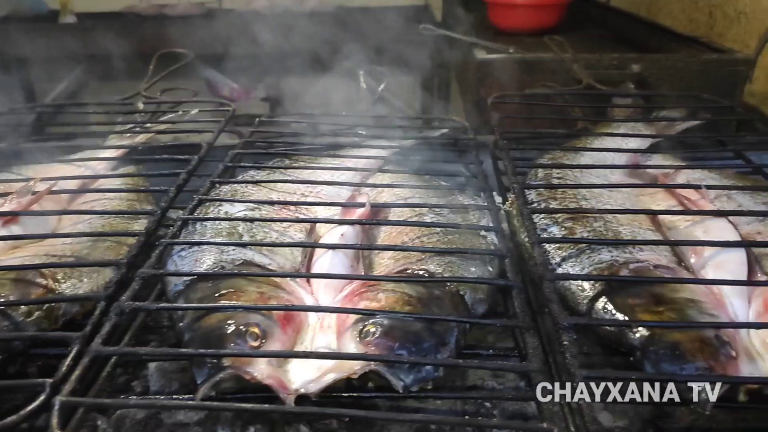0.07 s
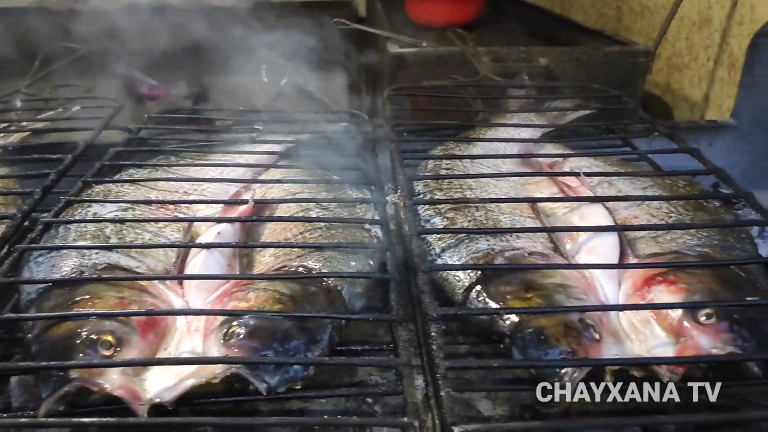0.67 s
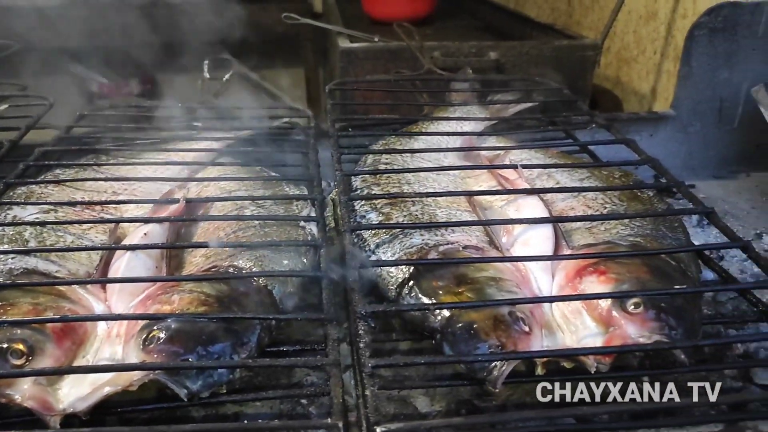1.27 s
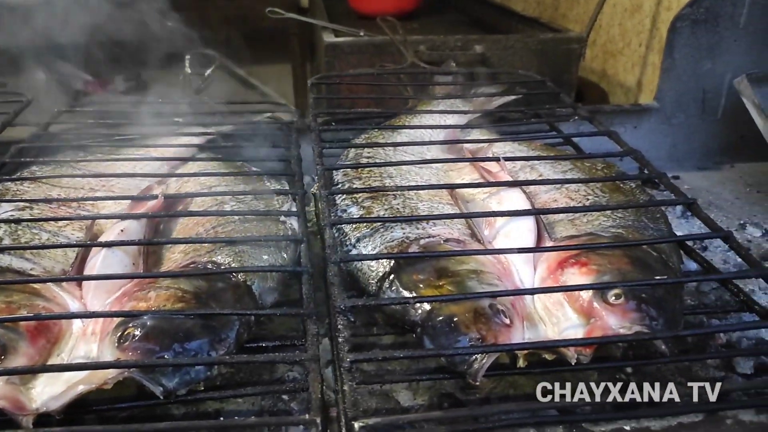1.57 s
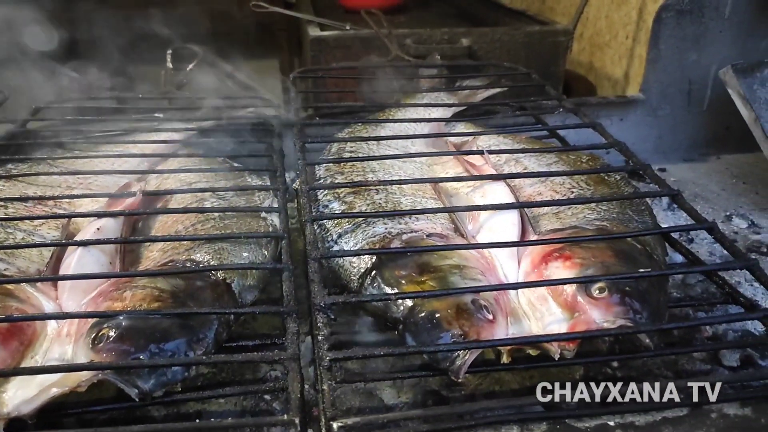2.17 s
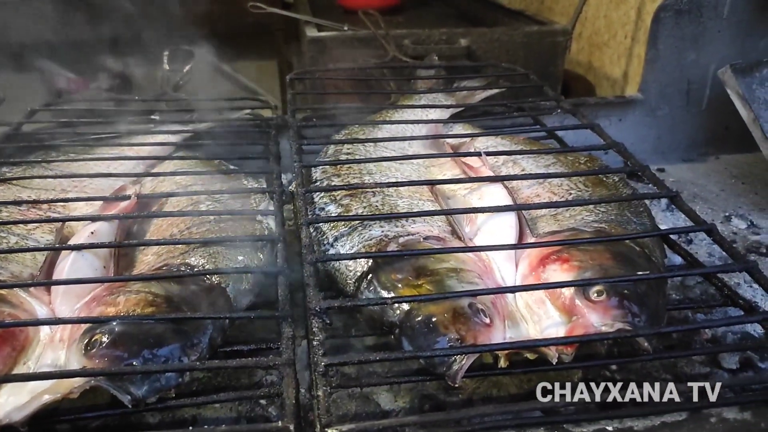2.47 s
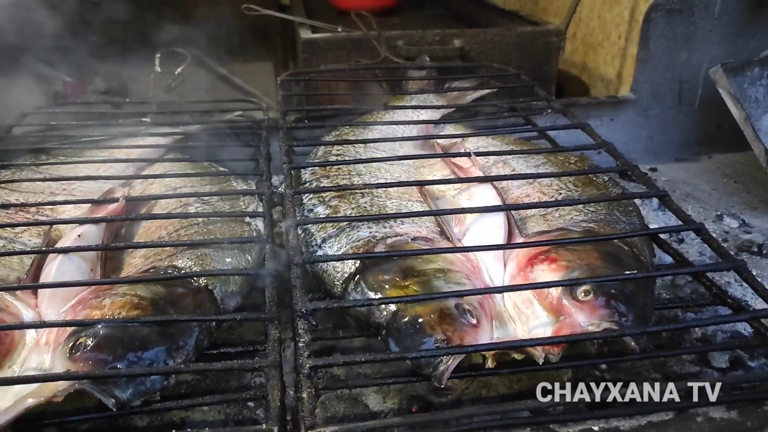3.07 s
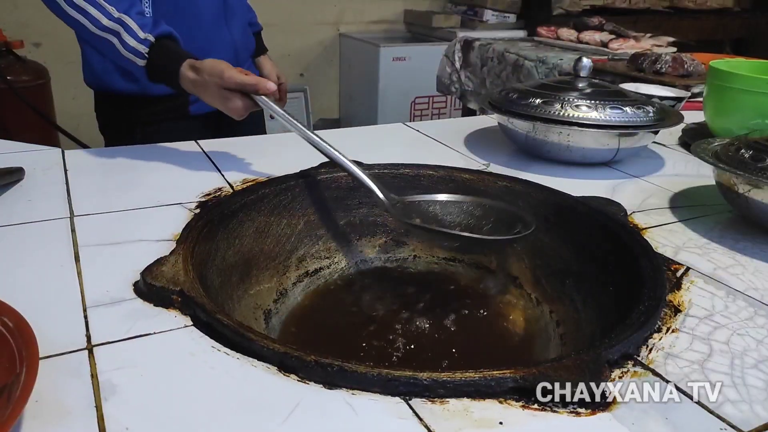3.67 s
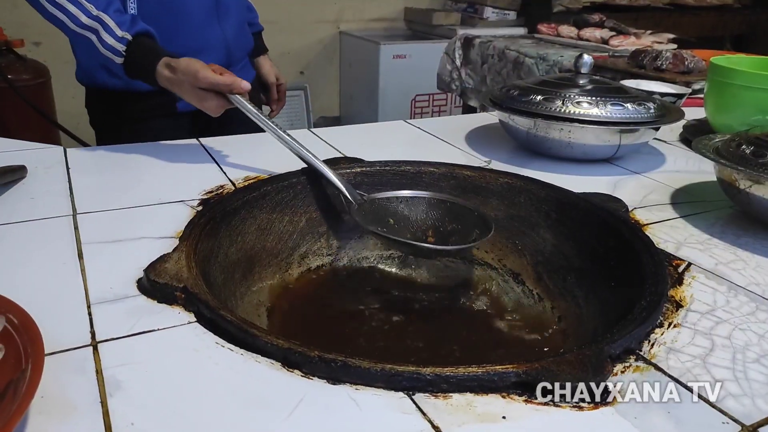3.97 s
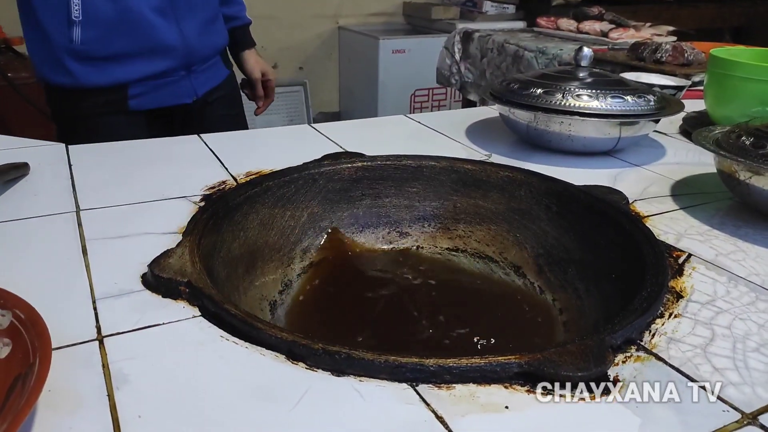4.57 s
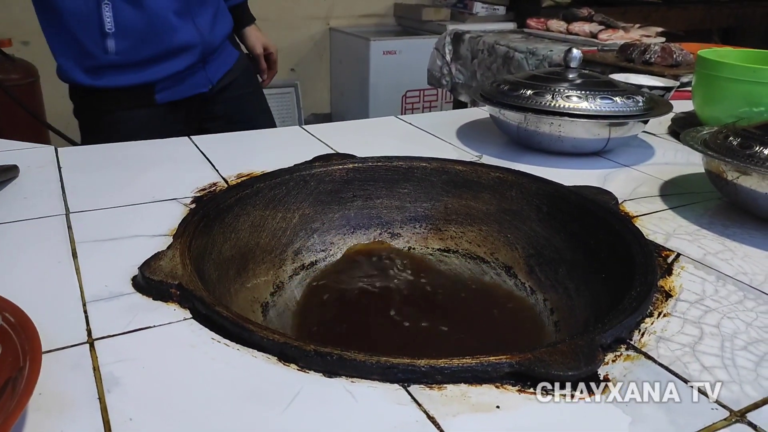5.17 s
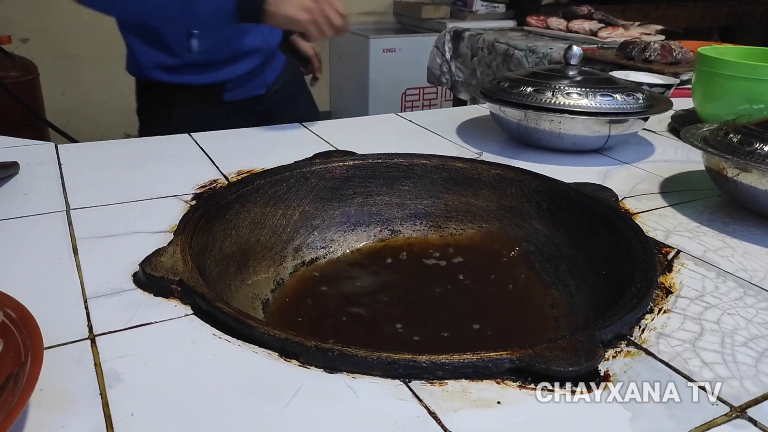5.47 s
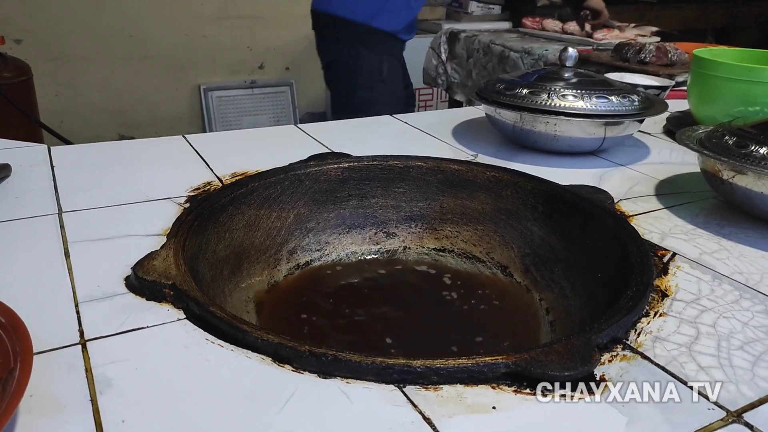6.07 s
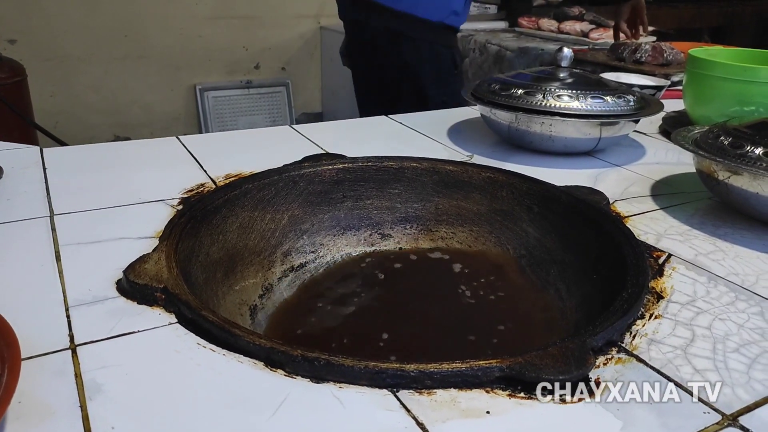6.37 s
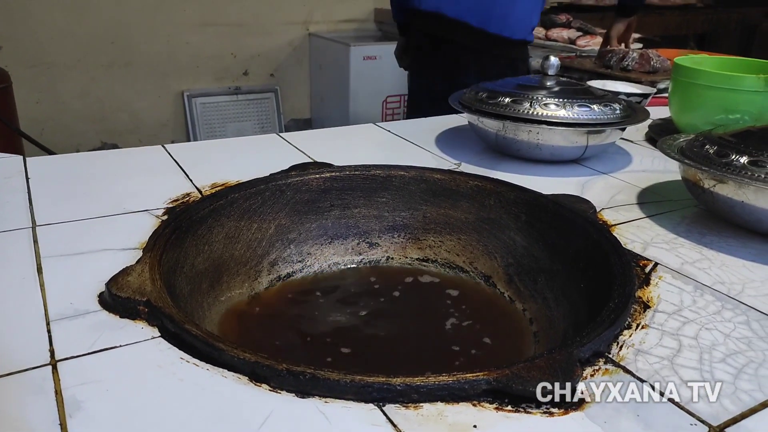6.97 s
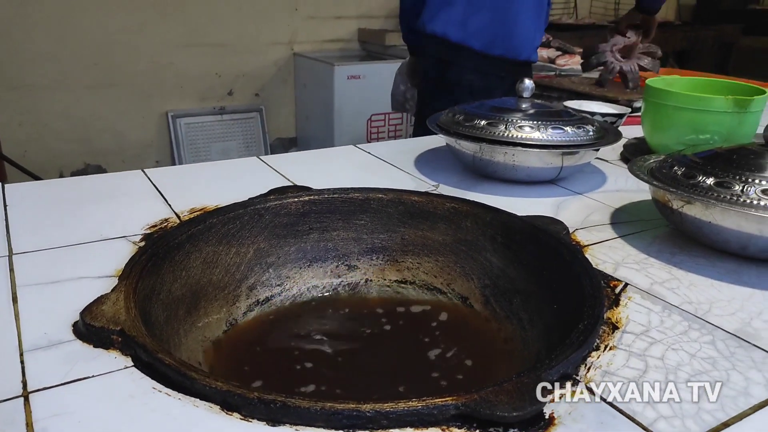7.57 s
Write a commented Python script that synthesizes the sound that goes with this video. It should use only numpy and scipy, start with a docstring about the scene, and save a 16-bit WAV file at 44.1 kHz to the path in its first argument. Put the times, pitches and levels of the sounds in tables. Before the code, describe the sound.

Fish sizzles on a charcoal grill in short hissing flares, with sharp snaps of fat over a low rush of air and a distant revving engine. The sound cuts to a tiled kitchen, where a gas burner rumbles under a cauldron. Water drops pop and crackle in the hot oil, then a steel skimmer clanks onto the counter. The burner carries on with a hiss and a faint whistle, heard close in stereo.

```python
"""Fish sizzles and spits on a charcoal grill as juice and fat hit the coals; an engine revs far off.
The grill fades out and a tiled kitchen fades in. There a gas burner rumbles under a cauldron,
water drops burst in the hot oil and a steel skimmer is laid on the counter.
Two microphones a hand's span apart hear both places."""
import sys
import numpy as np
from scipy import signal
from scipy.fft import rfft, irfft
from scipy.io import wavfile
from scipy.ndimage import uniform_filter1d

SR = 44100
rng = np.random.default_rng(int(sys.argv[2]) if len(sys.argv) > 2 else 0)


def put_to_file(sound):
    """Save the sound as 16-bit audio at rate SR, in the file named by the first command-line argument."""
    columns = np.atleast_2d(sound).T  # one column per channel
    safe = np.clip(columns, -1, 1)
    whole_steps = np.round(safe * 32767)
    wavfile.write(sys.argv[1], SR, whole_steps.astype(np.int16))


N = 344862
TIME = np.arange(N) / SR
HZ = np.maximum(np.arange(N // 2 + 1) * SR / N, 1)
MIC_SPAN_S = 0.00047   # travel time from one microphone to the other
KITCHEN_START_S = 3.412


def from_db(db):
    """Decibels to gain."""
    return 10 ** (np.asarray(db) / 20)


def unit_power(x):
    """Scale to unit power."""
    return x / np.sqrt(np.mean(x ** 2) + 1e-20)


def in_time(rows):
    """Each column of a curve, sample by sample."""
    time_s, *columns = np.transpose(rows)
    return [np.interp(TIME, time_s, column) for column in columns]


def swells(rows):
    """A smooth bump in dB for each row: middle_s, length_s (at half height), rise_db."""
    return sum(rise_db * .5 ** ((2 * (TIME - s) / length_s) ** 2) for s, length_s, rise_db in rows)


def colour(points, peaks=()):
    """Gain per frequency: an outline (freq_hz, gain_db) rolled off past its ends, plus resonances."""
    hz, db = np.transpose(points)
    gain_db = np.interp(np.log(HZ), np.log(hz), db)
    for centre_hz, width_hz, lift_db in peaks:
        gain_db = gain_db + lift_db / (1 + (2 * (HZ - centre_hz) / width_hz) ** 2)
    return from_db(gain_db) / np.sqrt((1 + (hz[0] / HZ / 1.3) ** 8) * (1 + (HZ / hz[-1] / 1.3) ** 8))


def drift(rate_hz):
    """A random wander with spread 1."""
    return unit_power(irfft(rfft(rng.standard_normal(N)) / (1 + (HZ / rate_hz) ** 2), N))


def diffuse(gain):
    """Noise from all sides: alike at both microphones in the bass, unrelated in the treble."""
    alike = np.clip(1.007 * np.sinc(2 * HZ * MIC_SPAN_S) / (1 + (HZ / 1500) ** 2), -1, 1)
    mid, side = rfft(rng.standard_normal((2, N)))
    pair = np.sqrt(1 + alike) * mid + np.sqrt(1 - alike) * side * [[1], [-1]]
    return unit_power(irfft(gain * pair, N))


def direct(x, lag_ms, gain=1):
    """Sound from the left reaches the right microphone later."""
    lag_s = np.array([[0], [lag_ms / 1000]])
    return irfft(rfft(x) * gain * np.exp(-2j * np.pi * HZ * lag_s), N)


def panned(pan_db):
    """Left and right gains; positive is to the left."""
    return from_db(np.array([[.5], [-.5]]) * pan_db)


def add(out, start_s, sound):
    """Mix a short sound in."""
    start = int(start_s * SR)
    out[:, start:start + sound.shape[-1]] += sound[..., :N - start]


def echoes(x, t60_s, gain=1):
    """Dense reflections that die away, different at each microphone."""
    t = TIME[:SR]
    tail = diffuse(gain)[:, :SR] * from_db(-60 * t / t60_s) * np.clip(t / 0.00074, 0, 1)
    return signal.fftconvolve(x, tail / np.sqrt(np.sum(tail ** 2) / 2), axes=1)[:, :N]


def steadied(x, window_s):
    """Even out the chance swings of a noise's level."""
    return x / np.sqrt(uniform_filter1d(np.mean(x ** 2, axis=0), int(window_s * SR)) + 1e-12)


def crackle(per_s, spread_db):
    """Tiny bursts of uneven size at random moments; unit power."""
    sizes = from_db(spread_db * np.minimum(rng.exponential(1, N), 4)) * rng.choice([-1, 1], N)
    return unit_power(sizes * (rng.random(N) < per_s / SR))


def snaps(rows, t60_s, grit_db):
    """A sharp click with a short gritty tail for each row: start_s, level_db, pan_db."""
    out, t = np.zeros((2, N)), TIME[:SR // 10]
    for start_s, level_db, pan_db in rows:
        snap = (t == 0) + rng.standard_normal(len(t)) * from_db(grit_db - 60 * t / t60_s)
        add(out, start_s, from_db(level_db) * panned(pan_db) * snap)
    return out


def draught():
    """Air moves steadily all round the grill, and some comes straight from the left."""
    # spectrum of the air: freq_hz, gain_db
    spectrum = [(15, -18), (25, -9), (54, -6.5), (100, -4), (192, -7.5), (223, -7), (248, -9.5),
                (281, -8.5), (387, -4.5), (468, -18.5), (567, -15.5), (796, -20.5), (1300, -22),
                (2210, -26), (4000, -30), (5200, -66), (8800, -120)]
    # its resonances: centre_hz, width_hz, lift_db
    resonances = [(130, 18, 2.4), (294, 20, 2), (384.5, 18, 3.9), (573, 19, 9), (1120, 67, 4.7),
                  (1310, 80, 3.1)]
    # strength of the draught: time_s, level_db
    strength = [(0, -38.5), (.5, -37.5), (1.1, -37.5), (1.7, -39), (2.4, -39.5), (3.2, -39)]
    air = colour(spectrum, resonances)
    from_left = unit_power(direct(rng.standard_normal(N), lag_ms=0.48, gain=air))
    level = from_db(in_time(strength)[0] + .5 * drift(15))
    return level * (from_db(-0.7) * diffuse(air) + from_db(-6) * from_left)


def sizzle_level(treble):
    """Each drip flares, sags while it boils away, then dies back into a simmer that slowly dries up."""
    # juice dripping on the coals: start_s, level_db, attack_s, hold_s, treble_db
    drips = [(0.187, -46, 0.03, .012, 5.5), (0.45, -50, .035, .015, 3), (0.817, -46, .012, .012, -1),
             (0.976, -44.5, 0.11, 0.069, -3), (1.149, -43, 0.03, .008, 1.5), (2.213, -50, 0.037, .03, 0),
             (2.269, -38, 0.006, 0.12, -0.5)]
    simmer_db, drying_db_per_s, sag_db_per_s, release_db_per_s = -53, 0.8, 32.5, 145
    power = from_db(simmer_db - drying_db_per_s * TIME) ** 2
    for start_s, level_db, attack_s, hold_s, treble_db in drips:
        age = np.maximum(TIME - start_s, 0)
        fall_db = sag_db_per_s * age + release_db_per_s * np.maximum(age - attack_s - hold_s, 0)
        power += (np.minimum(age / attack_s, 1) * from_db(level_db + treble * treble_db - fall_db)) ** 2
    return np.sqrt(power)


def sizzle():
    """Juice boils off the coals in a grainy hiss; some drips are brighter than others."""
    # spectrum of the boiling juice: freq_hz, gain_db
    spectrum = [(900, -6.5), (2000, -5), (3300, -3.5), (5000, -6.5), (7400, -1.5), (9800, -9.5),
                (12000, -6), (15500, -9)]
    tone = colour(spectrum)
    grains = unit_power(direct(crackle(per_s=7000, spread_db=7), lag_ms=0.555, gain=tone))
    boil = from_db(1.25 * drift(40)) * (from_db(-6.5) * grains * panned(2.8) + from_db(3) * diffuse(tone))
    top = irfft(rfft(boil) / (1 + (9500 / HZ) ** 8), N)
    return sizzle_level(treble=False) * (boil - top) + sizzle_level(treble=True) * top


def spits():
    """Fat snaps on the coals over a faint tick of embers, with a short and a longer echo."""
    # spitting fat: start_s, level_db, pan_db
    fat = [(0.115, -15.5, -4), (0.8178, 1, 2), (1.723, -15, -3), (2.2114, -15, -0.5), (2.2741, -20, 17),
           (2.5461, -18, .5), (2.878, -19, -3), (2.9112, -16.5, 2)]
    embers = from_db(-71) * crackle(per_s=14, spread_db=6)
    sharp = colour([(1500, -9), (3100, -10), (4100, -5.5), (5600, -2.5), (7600, 0), (9800, -6.5),
                    (12000, -4.5), (15000, -6.5)])
    near = direct(snaps(fat, t60_s=0.0083, grit_db=-19.5) + embers, lag_ms=0.55, gain=sharp)
    return near + from_db(-6) * echoes(near, t60_s=0.065) + from_db(-3) * echoes(near, t60_s=0.39)


def engine():
    """Far off, a firing tone and its octave rise and fall with the throttle over the exhaust's rumble."""
    # the engine revving: time_s, firing_hz, level_db
    throttle = [(.4, 48.04, -62), (.58, 47.7, -57), (.7, 44.6, -37), (.85, 51.8, -33), (1.03, 61.2, -37),
                (1.2, 62.6, -50), (1.55, 60.6, -44), (1.8, 58.2, -34.5), (2.05, 58.6, -33),
                (2.4, 56.36, -37), (2.8, 46.5, -46), (3.3, 52.5, -46)]
    # the octave barks as it takes up the load: middle_s, length_s, rise_db
    bark = [(.57, 0.14, 14)]
    firing_hz, level_db = in_time(throttle)
    load_s = throttle[0][0]
    phase = 2 * np.pi * np.cumsum(firing_hz) / SR
    octave = from_db(-53.5 + swells(bark)) * np.minimum(TIME / load_s, 1) * np.sin(2 * phase)
    under_load = np.clip((TIME - load_s) / .3, 0, 1)
    exhaust = from_db(-46) * under_load * diffuse(colour([(25, -6), (50, 1.5), (85, -2.5)]))
    return np.sqrt(2) * (from_db(level_db) * np.sin(phase) + octave) + exhaust


def flame():
    """Strength of the gas flame in dB: a slow rise with surges on top."""
    # the flame flares up: middle_s, length_s, rise_db
    surges = [(3.72, 0.44, 3), (5.14, 0.15, 3.5), (6.4, 0.4, 6), (6.69, 0.12, 2), (7.08, 0.24, 3.5),
              (7.46, 0.32, 4)]
    rise_db_per_s = 0.17
    return rise_db_per_s * (TIME - KITCHEN_START_S) + swells(surges)


def burner():
    """The flame throbs and rumbles in the firebox, with a rush above it."""
    # spectrum of the flame: freq_hz, gain_db
    spectrum = [(15, -41), (25, -11), (57, 0), (176, -2.5), (245, -6), (281, -10), (317, -13.5), (352, -8),
                (482, -17.5), (554, -10.5), (1600, -30.5), (2080, -61), (3520, -120)]
    # firebox resonances: centre_hz, width_hz, lift_db
    firebox = [(90, 15, 3.4), (129.5, 11, 6), (167.8, 17, 7.4), (189.2, 12, 6.2), (274.6, 27, 7.3),
               (303, 10, 4.9), (353.2, 8.5, 7.8), (388.5, 16, 8.6), (444, 11, 6.5), (548.3, 10.4, 9.6),
               (579, 6.4, 6.6), (604, 9.1, 5.5), (667, 25, 6.2), (1003, 170, 8.1), (1229, 48, 12),
               (1403, 25, 12), (1466, 20, 6)]
    # the rumble alone swells and sags: middle_s, length_s, rise_db
    booms = [(3.76, .36, 1.5), (4.85, 0.26, -1), (5.1, 0.087, -0.5), (5.33, 0.043, 2), (5.45, 0.17, 4),
             (5.72, 0.16, 2), (6.055, 0.066, 6.5), (6.19, 0.074, -3.5), (6.63, .11, -1.5),
             (6.77, 0.09, 4.5), (6.92, 0.11, 5), (7.12, 0.18, 1.5), (7.41, .1, -1.5), (7.53, 0.22, 1)]
    # its deepest part drops away: middle_s, length_s, rise_db
    lull = [(6.42, 0.37, -6.5)]
    roar, low_share = colour(spectrum, firebox), 1 / (1 + (HZ / 400) ** 6)
    lower, upper = roar * np.sqrt(low_share), roar * np.sqrt(1 - low_share)
    rumble_db = -35 + 0.64 * flame() + swells(booms) + 1.4 * drift(9)
    rumble = from_db(rumble_db) * steadied(diffuse(lower), window_s=0.18)
    deep = irfft(rfft(rumble) / (1 + (HZ / 105) ** 8) / (1 + (40 / HZ) ** 4), N)
    rumble += (from_db(swells(lull)) - 1) * deep
    # part of the rush comes straight from the cauldron, the rest by way of the walls
    ahead = unit_power(direct(rng.standard_normal(N), lag_ms=0.1, gain=upper))
    rush_db = -45.5 + flame() + 0.7 * drift(10)
    return rumble + from_db(rush_db) * (from_db(-1.5) * diffuse(upper) + from_db(0.5) * ahead)


def gas_hiss():
    """Gas hisses from the jet, flickering, following the flame and slowly growing."""
    # spectrum of the gas: freq_hz, gain_db
    spectrum = [(700, -3.5), (1200, 3.5), (2200, 1.5), (3200, -2), (4100, -7.5), (4800, -8.5), (5850, -13),
                (7400, -8), (9200, -18.5), (12000, -17.5), (15500, -24)]
    # faint whistling of the jet: centre_hz, width_hz, lift_db
    resonances = [(2950, 96, 4.5), (3340, 280, 5)]
    jet, rise_db_per_s = colour(spectrum, resonances), 0.51
    near = unit_power(direct(crackle(per_s=11000, spread_db=1), lag_ms=0.286, gain=jet))
    level_db = -52.5 + 0.64 * flame() + 0.8 * drift(21) + rise_db_per_s * (TIME - KITCHEN_START_S)
    return from_db(level_db) * (from_db(4) * diffuse(jet) + from_db(-5.5) * near)


def whistle():
    """Off to the left the gas jet sings: a narrow band of noise that wavers in pitch and level."""
    # the whistle grows, climbs a little and spurts once: time_s, pitch_hz, level_db
    course = [(5.2, 3115, -62), (6.3, 3160, -59), (6.62, 3210, -53), (7.1, 3184, -52), (7.41, 3220, -51.5),
              (7.45, 3270, -42), (7.49, 3230, -48), (7.8, 3220, -52.5)]
    spread_hz, waver_hz, flutter_db = 150, 70, 1.6
    pitch_hz, level_db = in_time(course)
    phase = 2 * np.pi * np.cumsum(pitch_hz + waver_hz * drift(8)) / SR
    band = np.array([drift(spread_hz) * np.cos(phase) + drift(spread_hz) * np.sin(phase) for _ in "LR"])
    return from_db(level_db + flutter_db * drift(7.9)) * panned(7) * band


def fizz():
    """Water off the wet skimmer fizzes in the oil, then dies down to a simmer and stray ticks."""
    peak_s, fall_db_per_s = 3.33, 23
    level = from_db(-55 - fall_db_per_s * np.abs(TIME - peak_s)) + from_db(-73 + flame())
    stray = from_db(-68.5) * crackle(per_s=9.8, spread_db=1)
    tiny_drops = crackle(per_s=290, spread_db=18)
    larger_drops = from_db(-3.5) * crackle(per_s=20, spread_db=4)
    return level * (tiny_drops + larger_drops) + stray


def bubble(pitch_hz, width_hz):
    """A bursting bubble's note swells and dies within a few cycles; peak 1."""
    t = TIME[:SR // 40]
    note = t * np.exp(-np.pi * width_hz * t) * np.sin(2 * np.pi * pitch_hz * t)
    return note / np.abs(note).max()


def spatter():
    """Small droplets burst in the hot oil as sharp high ticks over the fizz."""
    # the loudest droplets: start_s, level_db, pitch_hz, width_hz, pan_db
    droplets = [(3.478, -29, 7000, 9000, 3), (3.5312, -37, 6400, 5000, -4), (3.556, -35, 12000, 6000, 2),
                (3.5602, -26.5, 7600, 3000, 0), (3.584, -19, 9630, 9000, -2), (3.6263, -35, 7750, 1500, 0),
                (3.6494, -28.5, 6500, 2980, 2), (3.667, -30, 8000, 5000, .5), (3.699, -21, 7560, 2200, -.5),
                (3.7, -29, 12500, 5000, 0), (3.77, -35, 7400, 5000, -.5), (3.787, -31, 6900, 5000, 0),
                (3.808, -19, 11000, 6000, 0), (3.838, -33, 8300, 2000, 0), (3.853, -22, 11500, 6000, -1),
                (3.866, -14, 7040, 6000, -3), (3.869, -12.5, 8200, 5000, 5), (3.871, -26, 12500, 5000, 0),
                (3.923, -33, 12000, 6000, 0), (4.008, -25.5, 7600, 6000, -2), (4.0555, -41, 7000, 4000, -5),
                (4.088, -36, 10900, 7000, 0), (4.1093, -27, 12000, 6000, -.5),
                (4.1283, -22.5, 8640, 8000, -1.5), (4.189, -21, 5700, 7800, -3),
                (4.5816, -31.5, 6740, 4030, 0), (4.6425, -36.5, 5260, 2000, -1),
                (5.0729, -32, 8500, 9000, 6), (5.265, -43, 4100, 700, 0), (5.35, -34, 6660, 3000, -3),
                (5.768, -36, 8900, 5000, -10), (6.145, -36, 9000, 7000, 0), (7.5925, -38, 7250, 4000, 12)]
    ticks = np.zeros((2, N)) + fizz()
    for start_s, level_db, pitch_hz, width_hz, pan_db in droplets:
        add(ticks, start_s, from_db(level_db + 4.5) * panned(pan_db) * bubble(pitch_hz, width_hz))
    tone = colour([(2500, 7.5), (5400, -5.5), (7500, 2), (9600, -8), (11500, 0), (15500, 2)])
    ticks = direct(ticks, lag_ms=0.029, gain=tone)
    # the near wall of the bowl answers at once, the rest of it a little longer
    return ticks + from_db(-5) * echoes(ticks, t60_s=0.007) + from_db(-7.5) * echoes(ticks, t60_s=0.068)


def oil_pops():
    """Steam bubbles burst with a knock and a damped note; the iron bowl throws back a dense clack."""
    # water drops in the oil: start_s, level_db, pitch_hz, width_hz, overtone_db, knock_db, pan_db
    drops = [(3.5568, -16, 3170, 800, -14.5, -15.5, -0.5), (3.6928, -19, 1280, 1300, -1.5, 8, 1),
             (3.8657, -14.5, 1610, 2090, 5.5, 2, 0), (3.9227, -7.5, 2230, 1610, -14.5, -14, 1),
             (3.982, -19.5, 2640, 1500, -10, -10, 0), (4.187, -4.5, 1775, 1190, -9, -26, -1),
             (4.4548, -24, 2950, 750, -20, 0, 1.5)]
    # resonances of the iron bowl: centre_hz, width_hz, lift_db
    bowl = [(1990, 320, 2.5), (2450, 260, 1.5), (3080, 540, 5)]
    notes, knocks = np.zeros((2, 2, N))
    knock_s = 0.0001   # half length of the pressure pulse as a bubble tears open
    pulse = -np.exp(-(TIME[:SR // 100] / knock_s - 2) ** 2)
    for start_s, level_db, pitch_hz, width_hz, overtone_db, knock_db, pan_db in drops:
        note = bubble(pitch_hz, width_hz) + from_db(overtone_db) * bubble(1.85 * pitch_hz, width_hz)
        add(notes, start_s, from_db(level_db) * panned(pan_db) * note)
        add(knocks, start_s, from_db(level_db + knock_db) * panned(pan_db) * pulse)
    notes = signal.sosfilt(signal.butter(4, 1220, "high", fs=SR, output="sos"), notes)
    tone = colour([(300, 2.5), (1000, -1), (3300, -2.5), (4500, -3), (12000, -4)], bowl)
    pops = direct(notes + knocks, lag_ms=0.091, gain=tone)
    return pops + from_db(-3.5) * echoes(pops, t60_s=0.043) + from_db(-2.5) * echoes(pops, t60_s=0.12)


def skimmer():
    """Steel meets tile: each touch cracks and clatters, the counter knocks and the skimmer rings."""
    # touches on the tiles: start_s, ring_db, crack_db, tilt_db_per_octave
    touches = [(4.832, -35, -16, 3), (4.8966, -16.5, 5, -1.5), (4.981, -29, -8, -4.5)]
    # modes of the steel skimmer: pitch_hz, level_db, t60_s
    steel_modes = [(1470, -9, .08), (1921, -11, .11), (2395, -12, .2), (2570, -12, .06), (2790, -8, .05),
                   (2884, 1, .07), (3110, -10, .05), (3434, -1, .075), (4020, -7, .078), (4683, -15, .095),
                   (5150, -23, .09), (6073, -21, .15), (6840, -21, .13), (7655, -19, .08), (8820, -25, .1),
                   (10400, -29, .06), (11940, -27, .08)]
    # modes of the tiled counter: pitch_hz, level_db, t60_s
    counter_modes = [(423, -20, .06), (662, -16, 0.11), (1060, -21, 0.047)]
    ring, t = np.zeros((2, N)), TIME[:SR // 2]
    for start_s, ring_db, _, tilt in touches:
        for pitch_hz, mode_db, t60_s in steel_modes + counter_modes:
            level_db = ring_db + mode_db + tilt * np.log2(pitch_hz / 3000) + rng.normal(0, 1, (2, 1))
            phase = rng.uniform(0, 2 * np.pi) + rng.normal(0, 0.72, (2, 1))
            mode = from_db(level_db - 60 * t / t60_s) * np.sin(2 * np.pi * pitch_hz * t + phase)
            add(ring, start_s, mode)
    clicks = snaps([(s, crack_db, 2) for s, _, crack_db, _ in touches], t60_s=0.0093, grit_db=-10.5)
    hard = colour([(450, -9), (900, -7), (1600, 5), (3000, 8), (3800, 4), (4400, -5), (5500, -8),
                   (7800, -4), (10000, -14.5), (13000, -17), (15000, -17)])
    dull = colour([(450, 3), (900, 2), (1900, -1), (2900, -9), (6000, -8), (15000, -11)])
    crack = direct(clicks, lag_ms=0.281, gain=hard)
    clatter = echoes(crack, t60_s=0.12, gain=dull)
    slap = np.roll(crack, int(0.0079 * SR), axis=1)   # back off a near wall
    return ring + crack + from_db(-4) * clatter + from_db(-22) * slap


def scuff(middle_s=5.155, length_s=.1, level_db=-41):
    """Something slides briefly over the counter with a dull, uneven rub."""
    tone = colour([(520, -11), (680, 3), (820, -2), (1000, -14)])
    rub = unit_power(direct(crackle(per_s=900, spread_db=1), lag_ms=0.25, gain=tone))
    return from_db(level_db) * .5 ** ((2 * (TIME - middle_s) / length_s) ** 2) * rub


def kitchen():
    """The burner, with oil and skimmer echoing off the tiles."""
    # colour of the kitchen's echo: freq_hz, gain_db
    walls = [(200, -1), (1000, 0), (3200, -0.5), (5000, -5), (9000, -2), (16000, -16)]
    pot, steel = oil_pops() + spatter(), skimmer()
    room = echoes(from_db(-15) * pot + from_db(-15.5) * steel, t60_s=0.32, gain=colour(walls))
    return burner() + gas_hiss() + whistle() + pot + steel + scuff() + room


def scene():
    """The grill fades out; the kitchen fades in while an offset in the right channel drains away."""
    grill = draught() + sizzle() + spits() + engine()
    fade_out = np.clip((3.308 - TIME) / 0.087, 0, 1)
    since_s = np.maximum(TIME - KITCHEN_START_S, 0)
    fade_in = np.clip(since_s / 0.097, 0, 1)
    offset = -.62 * np.exp(-since_s / 0.25) * np.array([[0], [1]])
    return grill * fade_out + (kitchen() + offset) * fade_in


def record(dry):
    """The loudest peaks are clipped and the top is cut at 15.4 kHz."""
    low_pass = signal.ellip(10, .1, 80, 15400, fs=SR, output="sos")
    return signal.sosfilt(low_pass, np.clip(dry, -.87, .87))


dry = scene()
out = record(dry)
put_to_file(out)
```